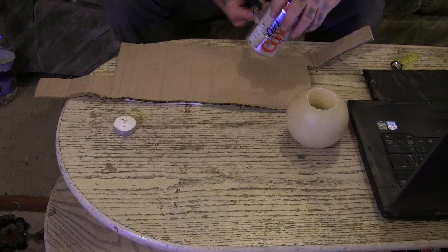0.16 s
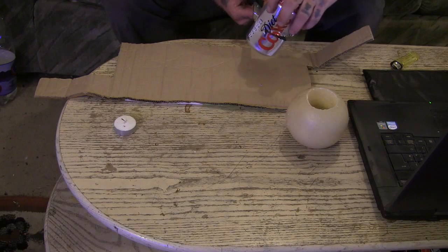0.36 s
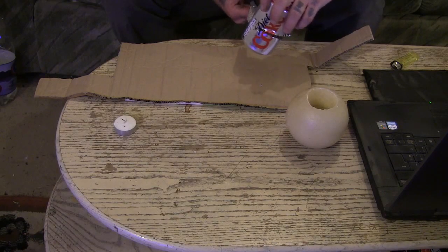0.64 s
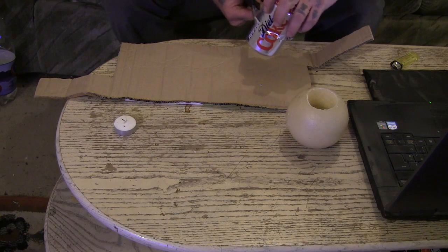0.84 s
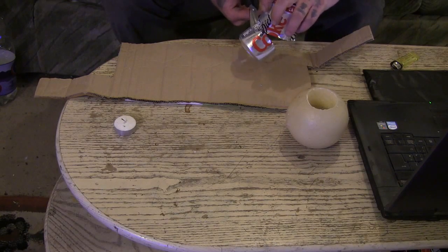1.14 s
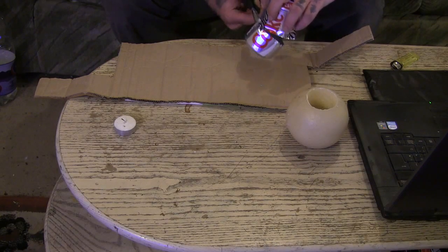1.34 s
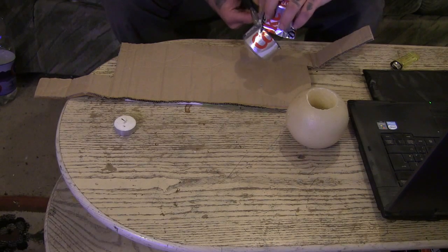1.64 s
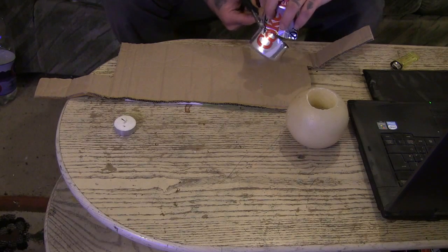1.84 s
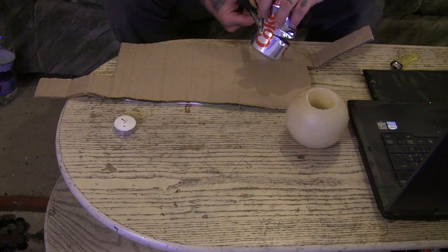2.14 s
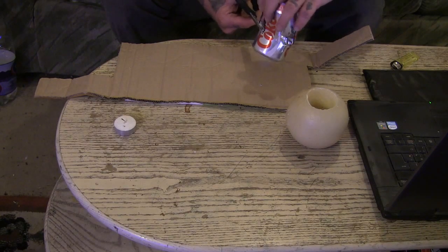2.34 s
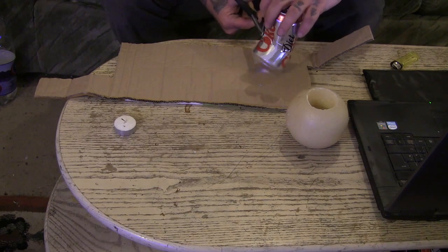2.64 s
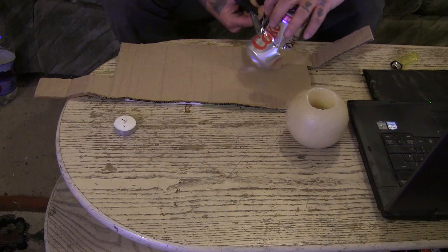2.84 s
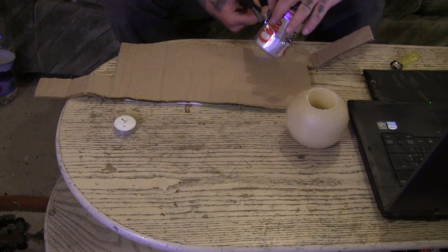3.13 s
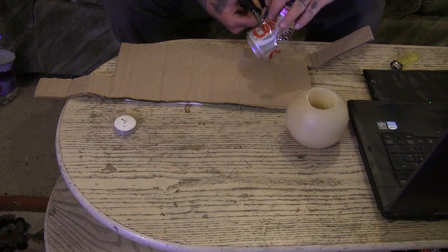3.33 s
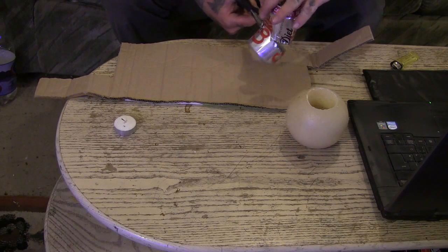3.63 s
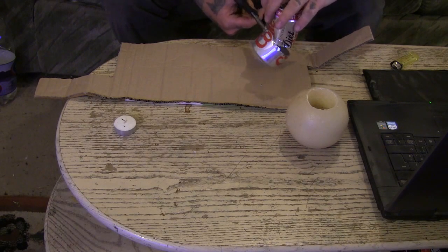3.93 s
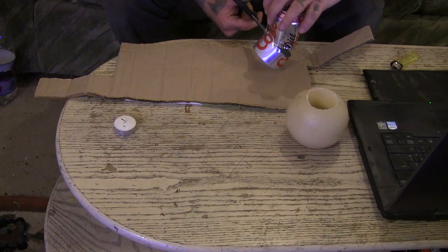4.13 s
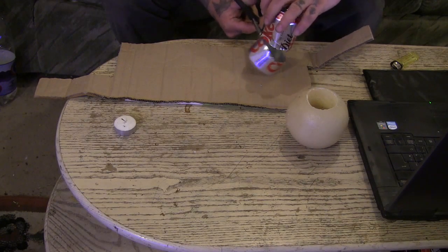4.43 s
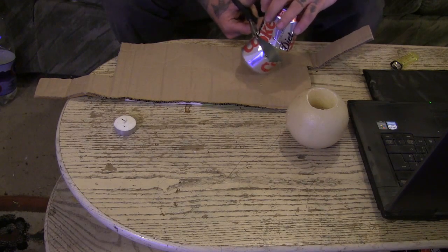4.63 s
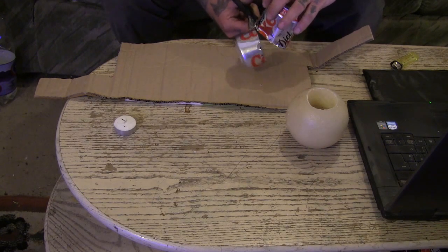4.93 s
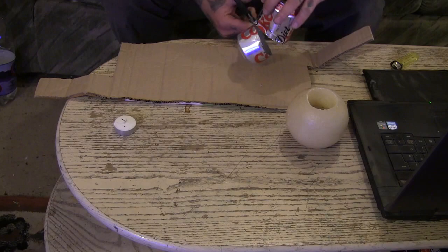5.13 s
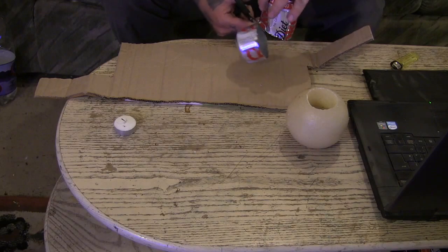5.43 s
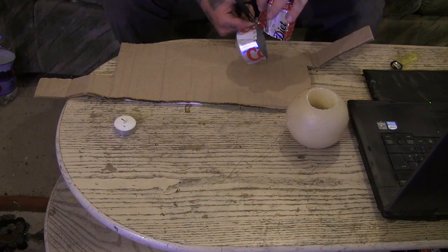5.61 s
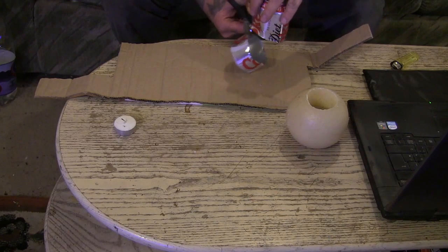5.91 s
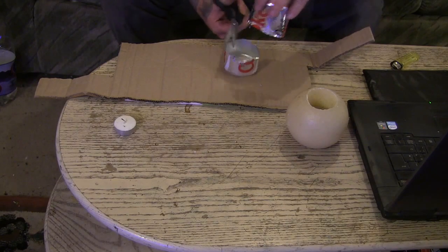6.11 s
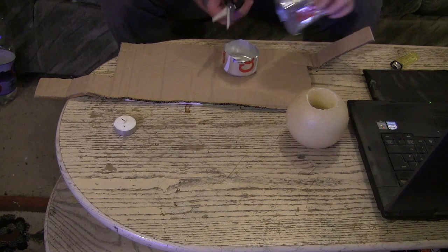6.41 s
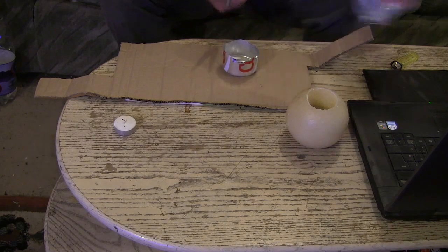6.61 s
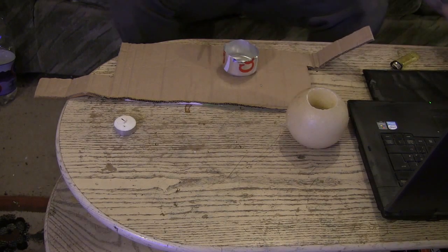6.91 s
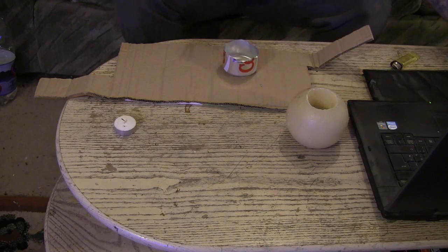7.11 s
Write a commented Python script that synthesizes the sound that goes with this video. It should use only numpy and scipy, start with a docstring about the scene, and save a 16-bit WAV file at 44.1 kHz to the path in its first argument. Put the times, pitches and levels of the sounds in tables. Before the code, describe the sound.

Thin can metal crunches, pops and crinkles under clicking scissor blades in a small room, ending with a hollow knock on cardboard.

```python
"""Crunching snips and sharp metallic snaps: scissors cut round a thin aluminium can in a small room.
Each stroke shears the metal in a burst of tiny slips; the wall buckles and rings briefly, at a pitch
that depends on how it is bent and held. Between cuts the can crinkles and the blades click.
Near the end the cut-off base drops on cardboard. Room noise and a faint whine lie underneath."""
import sys
import numpy as np
from scipy import signal
from scipy.fft import rfft, irfft, next_fast_len
from scipy.io import wavfile
from scipy.ndimage import uniform_filter1d, minimum_filter1d, map_coordinates

SR = 44100
rng = np.random.default_rng(int(sys.argv[2]) if len(sys.argv) > 2 else 0)


def generate_wav(sig):
    """Save sig (samples, or channels by samples) to the path in sys.argv[1] as 16-bit PCM at SR."""
    pcm = np.round(np.clip(np.atleast_2d(sig).T, -1, 1) * 32767).astype(np.int16)
    wavfile.write(sys.argv[1], SR, pcm)


N = 320144
CONTACT_S = np.arange(SR // 4) / SR  # time since one contact


def amp(db):
    return 10 ** (np.asarray(db) / 20)


def unit_rms(x):
    return x / np.sqrt(np.mean(x ** 2) + 1e-20)


def unit_energy(x):
    return x / np.sqrt(np.sum(x ** 2) + 1e-20)


def curve(points, hz):
    """Interpolate (Hz, value) points on a log frequency axis."""
    point_hz, values = np.transpose(points)
    return np.interp(np.log(hz + 1), np.log(point_hz + 1), values)


def filtered(x, gain):
    """Scale the spectrum of x by gain(hz)."""
    n = x.shape[-1]
    size = next_fast_len(n + SR // 8)
    return irfft(rfft(x, size) * gain(np.fft.rfftfreq(size, 1 / SR)), size)[..., :n]


def decay(t, t60_s):
    return np.exp(-np.log(1000) * t / np.maximum(t60_s, 1e-3))


def add(track, start_s, x):
    i = max(0, round(start_s * SR))
    track[..., i:i + x.shape[-1]] += x[..., :max(0, N - i)]


def dense_modes(spectrum_db, t60_s):
    """Countless overlapping modes: decaying noise through a minimum-phase filter."""
    n = len(CONTACT_S)
    cepstrum = irfft(np.log(amp(spectrum_db(np.fft.rfftfreq(2 * n, 1 / SR)))))
    cepstrum[1:n] *= 2
    cepstrum[n:] = 0
    noise = rng.standard_normal(n) * decay(CONTACT_S, t60_s)
    return unit_energy(irfft(rfft(noise, 2 * n) * np.exp(rfft(cepstrum)))[:n])


def ringing(modes, t60_s, scatter_db, detune, weight_db=np.zeros_like):
    """Distinct modes, each struck at a random strength and slightly detuned by bending."""
    hz, db = np.transpose(modes)
    strength, bend, polarity = rng.standard_normal((3, len(hz)))
    waves = np.cos(2 * np.pi * np.outer(hz * (1 + detune * bend), CONTACT_S)) * decay(CONTACT_S, t60_s)
    gains = np.sign(polarity) * amp(db + weight_db(hz) + scatter_db * strength)
    return unit_energy(gains @ waves)


def impulses(t, rate_per_s, spread_db):
    """Tiny jolts of uneven size at random moments."""
    occurs = rng.random(len(t)) < rate_per_s / SR
    size = amp(spread_db * np.clip(rng.standard_normal(len(t)), -2, 2))
    return occurs * rng.choice([-1, 1], len(t)) * size


# Room noise. Each row: frequency in Hz, relative density in dB.
AIR_SPECTRUM = [(15, -2.5), (35, -21.5), (70, -16.5), (120, -13.5), (150, -7), (200, -3.5), (340, -9),
                (700, -4.5), (1060, -4.5), (1400, -7.5), (3300, -15), (10800, -29.5), (16000, -37)]
# Its stereo width. Each row: frequency in Hz, left-right correlation.
AIR_CORRELATION = [(60, 0.31), (240, 0.43), (950, 0.92), (3770, 0.76), (15000, 0.55)]
# Electrical gear. Each row: frequency in Hz, relative level in dB.
WHINE_TONES = [(1044, -60.5), (1136, -65), (2266, -72.5), (3402, -70.5), (15622, -71.5)]
def background():
    """Steady room noise with a faint electrical whine."""
    def mid_side_gains(hz):
        angle = np.arccos(np.clip(curve(AIR_CORRELATION, hz), -1, 1)) / 2
        return amp(curve(AIR_SPECTRUM, hz)) * [np.cos(angle), np.sin(angle)]
    mid, side = filtered(rng.standard_normal((2, N)), mid_side_gains)
    t = np.arange(N) / SR
    whine = sum(amp(db) * np.sqrt(2) * np.sin(2 * np.pi * hz * t) for hz, db in WHINE_TONES)
    return amp(-52) * unit_rms(np.array([mid + side, mid - side])) + amp(-2) * whine


# Reverberation. Each row: frequency in Hz, T60 in seconds.
ROOM_T60 = [(200, 0.57), (530, 0.22), (1400, 0.26), (3700, 0.25), (12000, 0.16)]
# Width of the tail. Each row: frequency in Hz, side minus mid in dB.
ROOM_WIDTH = [(150, -19), (700, -10), (2000, -13.5), (4300, -8), (12000, -7.5)]
def in_room(x, wet_db, build_up_s=0.0011):
    """Direct sound plus the small room's tail, much alike left and right."""
    hz, t, spectra = signal.stft(rng.standard_normal((2, SR // 2)), SR, nperseg=256)
    spectra = spectra * decay(t, curve(ROOM_T60, hz)[:, None])
    spectra[1] *= amp(curve(ROOM_WIDTH, hz))[:, None]
    tails = signal.istft(spectra, SR, nperseg=256)[1]
    tails *= 1 - np.exp(-np.arange(tails.shape[1]) / SR / build_up_s)
    mid, side = amp(wet_db) * signal.fftconvolve(x[None], tails / np.linalg.norm(tails[0]), axes=1)
    mid[:len(x)] += x
    return np.array([mid + side, mid - side])


# Pitch of the bent wall. Each row: time in seconds, pitch in Hz.
WALL_PITCH = [(0.03, 804), (0.3, 915), (0.69, 930), (1.0, 775), (1.08, 990), (1.25, 1040), (1.55, 950),
              (1.84, 1090), (2.08, 980), (2.78, 1010), (2.9, 1595), (3.56, 1580), (3.62, 1300),
              (4.36, 1240), (4.55, 1190), (4.85, 1400), (5.68, 1490), (6.2, 1400)]
def wall_hz(time_s):
    """The pitch drifts as the cut opens and the grip changes."""
    return np.interp(time_s, *np.transpose(WALL_PITCH))


# The wall's dense modes. Each row: frequency in Hz, relative density in dB.
WALL_SPECTRUM = [(200, -61.5), (500, -6.5), (700, 9.5), (1000, -0.5), (1700, 7.5), (2300, -1),
                 (3200, -11.5), (6000, -42)]
# Its distinct bending modes. Each row: frequency in Hz, relative level in dB.
WALL_MODES = [(708, 4), (760, -2.5), (825, -5), (921, 5), (975, 2.5), (1060, -3), (1127, 3.5), (1235, 1),
              (1310, 1), (1418, -0.5), (1602, -1), (1671, -1.5), (1747, 0), (1996, 1.5), (2100, -4),
              (2316, -1.5)]
def wall(pitch_hz, width_octaves=0.12, focus_db=11, low_cut_db=11):
    """The pushed wall rings most near the bent panel's pitch, and little far below it."""
    def emphasis_db(hz):
        octaves = np.log2((hz + 1) / pitch_hz)
        peak_db = focus_db / (1 + (octaves / width_octaves) ** 2)
        return peak_db + low_cut_db * np.clip(octaves + 0.5, -1, 0)
    dense = dense_modes(lambda hz: curve(WALL_SPECTRUM, hz) + emphasis_db(hz), t60_s=0.045)
    ring = ringing(WALL_MODES, t60_s=0.098, scatter_db=1.5, detune=0.0061, weight_db=emphasis_db)
    return unit_energy(dense + amp(2) * ring)


# Breaking metal. Each row: frequency in Hz, relative density in dB.
CRACK_SPECTRUM = [(350, -30), (800, -22), (1900, -1.5), (2600, -5.5), (3500, 0.5), (4600, -5.5),
                  (6000, -7.5), (9000, -8), (12000, -12), (14000, -18.5), (16000, -45.5)]
# High modes of the cut rim and blades. Each row: frequency in Hz, relative level in dB.
RIM_MODES = [(2455, -6), (2607, -3), (3213, -3), (3435, 4), (3530, -1), (3760, -3), (4250, -5), (5410, -4),
             (6950, -9)]
def crack(brightness, t60_s, rim_db):
    """A sharp break in the metal sets the rim ringing; brightness tilts the treble."""
    def tilt_db(hz):
        return brightness * curve([(3500, 0.044), (9500, 0.88)], hz)
    dense = dense_modes(lambda hz: curve(CRACK_SPECTRUM, hz) + tilt_db(hz), t60_s)
    rim = ringing(RIM_MODES, t60_s=0.056, scatter_db=-1.5, detune=0.004, weight_db=tilt_db)
    return unit_energy(dense + amp(rim_db) * rim)


# Low knock. Each row: frequency in Hz, relative density in dB.
THUD_SPECTRUM = [(120, -33.5), (160, -10), (260, -16), (410, 3.5), (560, 1), (800, -6), (1600, -35.5)]
# Low modes of can and table. Each row: frequency in Hz, relative level in dB.
HOLLOW_MODES = [(265, -6.5), (407, 2), (560, -2)]
def thud(t60_s):
    """The low knock of the whole can and what it touches."""
    dense = dense_modes(lambda hz: curve(THUD_SPECTRUM, hz), t60_s)
    hollow = ringing(HOLLOW_MODES, t60_s=0.086, scatter_db=2, detune=0.0039)
    return unit_energy(dense + amp(-5) * hollow)


# Bumps; the base lands at 6.2 s. Each row: start in seconds, relative level in dB, hollow pitch in Hz.
CARDBOARD_KNOCKS = [(2.649, -36, 267), (4.313, -44, 425), (6.2062, -28.5, 559), (6.222, -32.5, 385),
                    (6.9057, -49, 564)]
def knocks(rise_s=0.002):
    """The can meets the cardboard: a thud, a hollow note, a ring and a dull crack."""
    out = np.zeros((2, N))
    envelope = decay(CONTACT_S, t60_s=0.11) * (1 - np.exp(-CONTACT_S / rise_s))
    for start_s, db, hollow_hz in CARDBOARD_KNOCKS:
        note = unit_energy(np.sin(2 * np.pi * hollow_hz * CONTACT_S) * envelope)
        ring = amp(5) * wall(wall_hz(start_s))
        tick = amp(-5.5) * crack(brightness=-7.5, t60_s=0.037, rim_db=-20)
        blow = amp(-2.5) * thud(t60_s=0.046) + amp(-2) * note + ring + tick
        add(out, start_s, in_room(amp(db + 26.5) * blow, wet_db=-5.5))
    return out


def rasp(force, pitch_hz, ring_db, crackle_db, brightness, slips_per_s):
    """While the force lasts, every stick-slip jolt crackles and shakes the wall."""
    t, length_s = np.arange(len(force)) / SR, len(force) / SR
    slips = force * impulses(t, slips_per_s, spread_db=4.5)
    # Early, middle and late slips each meet a differently bent sheet.
    stages = [slips * np.clip(1 - abs(2 * t / length_s - k), 0, 1) for k in range(3)]
    def driven(response):
        return unit_energy(sum(signal.fftconvolve(stage, response()) for stage in stages))
    ring = amp(ring_db - 3) * driven(lambda: wall(pitch_hz))
    crackle = amp(crackle_db - 2.33) * driven(lambda: crack(brightness, t60_s=0.012, rim_db=-6.5))
    rumble = amp(ring_db - 20) * driven(lambda: thud(t60_s=0.11))
    return in_room(np.sqrt(len(force)) * (ring + crackle + rumble), wet_db=-6.5)


# Turning the can. Each row: start in seconds, length in seconds, relative ring level in dB.
WALL_FLEXES = [(0.249, 0.1, -37.5), (0.377, 0.049, -30.5), (0.593, 0.068, -33), (1.25, 0.14, -32),
               (1.461, 0.097, -34), (1.662, 0.13, -38.5), (2.463, 0.028, -41), (2.794, 0.11, -44.5),
               (2.967, 0.064, -34.5), (3.132, 0.079, -37.5), (3.307, 0.074, -34), (3.615, 0.16, -38.5),
               (4.108, 0.044, -47.5), (4.63, 0.25, -42), (4.839, 0.091, -32), (5.1, 0.14, -34),
               (5.276, 0.13, -34.5), (5.421, 0.21, -39), (5.692, 0.13, -35.5), (6.102, 0.057, -42),
               (7.226, 0.05, -38)]
def flexes(clump_db=2, clump_s=0.01414):
    """Light, uneven handling crinkles the wall in clumps, with more ring than crackle."""
    out = np.zeros((2, N))
    for start_s, length_s, ring_db in WALL_FLEXES:
        t = np.arange(0, length_s, 1 / SR)
        clumps = map_coordinates(rng.standard_normal(100), [t / clump_s], mode="mirror")
        force = amp(clump_db * clumps)
        pitch_hz = wall_hz(start_s + length_s / 2)
        crackle_db = ring_db - 8
        add(out, start_s, rasp(force, pitch_hz, ring_db, crackle_db, brightness=-5, slips_per_s=900))
    return out


# Brief notes. Each row: start in seconds, length in seconds, pitch in Hz, level in dB.
PANEL_SQUEALS = [(0.026, 0.03, 1750, -21.5), (0.391, 0.03, 897, -37), (1.244, 0.024, 1080, -18.5),
                 (1.393, 0.026, 940, -31), (1.836, 0.039, 1190, -35.5), (2.589, 0.031, 955, -21.5),
                 (2.785, 0.043, 1120, -43.5), (3.423, 0.04, 1606, -24), (4.508, 0.04, 1774, -29),
                 (5.033, 0.035, 1446, -23), (5.945, 0.037, 1422, -33.5)]
def squeals(waver=0.0082):
    """Slips lock on to the bent panel's mode, which swells and fades with the blade's pressure."""
    out = np.zeros((2, N))
    for start_s, length_s, pitch_hz, db in PANEL_SQUEALS:
        n = round(length_s * SR)
        force = uniform_filter1d(np.hanning(n), size=200, mode="constant")
        drift = unit_rms(uniform_filter1d(rng.standard_normal(n), size=500))
        phase = 2 * np.pi * np.cumsum(pitch_hz * (1 + waver * drift)) / SR
        add(out, start_s, in_room(amp(db) * unit_rms(force * np.sin(phase)), wet_db=-8.5))
    return out


# Scissor steel. Each row: frequency in Hz, relative level in dB.
BLADE_MODES = [(1000, -4), (2004, -4), (2230, -4), (3450, -12.5), (5450, -7.5), (7200, -2)]
# The blades shut or catch on the rim. Each row: time in seconds, relative level in dB.
BLADE_CLICKS = [(0.13, -32), (0.226, -36.5), (0.3392, -30.5), (1.028, -22.5), (2.2993, -23.5),
                (2.477, -48.5), (2.782, -39.5), (2.83, -42), (3.242, -29.5), (3.5432, -30.5), (3.78, -41),
                (3.863, -31), (3.9089, -30), (4.483, -39), (4.5, -31), (4.583, -25.5), (4.62, -24),
                (5.284, -60), (5.305, -38.5), (5.5128, -38.5), (5.842, -26.5), (7.233, -39.5)]
def clicks(lead_in_s=0.008, can_hz=1935):
    """A faint, short lead-in, then the blades' bright click with a thin, high ring."""
    out, t = np.zeros((2, N)), np.arange(0, lead_in_s, 1 / SR)
    for time_s, db in BLADE_CLICKS:
        steel = amp(-6) * ringing(BLADE_MODES, t60_s=0.12, scatter_db=4, detune=0.002)
        can = amp(-7) * wall(can_hz) + amp(-21) * thud(t60_s=0.073)
        click = amp(db + 25) * (crack(brightness=9, t60_s=0.019, rim_db=-5.5) + steel + can)
        lead_in = unit_energy(impulses(t, rate_per_s=3500, spread_db=8.5) * t)
        add(out, time_s - lead_in_s, amp(-23) * signal.fftconvolve(lead_in, click))
        add(out, time_s, in_room(click, wet_db=-3.5))
    return out


# Buckling. Each row: time in seconds, then relative levels in dB of ring, crack and thud.
WALL_SNAPS = [(0.0266, -15.5, -14.5, -57), (0.24, -32.5, -31, -43), (0.2919, -22, -18.5, -44),
              (0.622, -25, -32, -39), (0.698, -19.5, -28, -32), (0.828, -13.5, -11.5, -65),
              (0.9859, -30, -21, -34), (1.062, -22, -11, -42), (1.229, -14, -17.5, -24),
              (1.254, -19, -35, -41.5), (1.434, -30, -20, -28), (1.44, -18, -17, -33.5),
              (1.658, -32.5, -36, -43), (1.695, -31, -38, -58.5), (1.784, -25.5, -26.5, -37.5),
              (1.822, -25, -25, -41), (2.05, -23.5, -13, -36), (2.582, -27.5, -18.5, -29),
              (2.613, -26.5, -17.5, -35), (2.916, -13.5, -21, -52), (3.048, -31, -35, -66),
              (3.338, -24.5, -32, -56), (3.4213, -23.5, -28.5, -58), (3.5999, -22.5, -21, -38.5),
              (4.357, -36.5, -44.5, -55), (4.508, -25, -20, -64), (4.5464, -22.5, -21, -46.5),
              (4.845, -22.5, -31, -65), (4.896, -27, -35, -40), (5.037, -23.5, -24, -53),
              (5.135, -32, -35.5, -61), (5.6812, -22.5, -29, -42), (5.939, -34, -26, -49)]
def snaps(lead_in_s=0.014):
    """The wall pops through with a crack, a ring and a thud; a faint lead-in swells into each snap."""
    out, t = np.zeros((2, N)), np.arange(0, lead_in_s, 1 / SR)
    for time_s, ring_db, crack_db, thud_db in WALL_SNAPS:
        ring = amp(ring_db + 26.5) * wall(wall_hz(time_s))
        brightness = -3 + 0.77 * (crack_db - ring_db)
        tick = amp(crack_db + 26) * crack(brightness, t60_s=0.052, rim_db=-12)
        knock = amp(thud_db + 25) * thud(t60_s=0.048)
        lead_in = unit_energy(impulses(t, rate_per_s=14000, spread_db=-6.5) * t)
        add(out, time_s - lead_in_s, amp(-20.5) * signal.fftconvolve(lead_in, ring + tick))
        add(out, time_s, in_room(ring + knock, wet_db=-4.5))
        add(out, time_s, in_room(tick, wet_db=-5))
    return out


# Strokes. Each row: start and length in seconds, relative crackle and ring levels in dB, brightness.
SCISSOR_CUTS = [(0, 0.026, -22, -21, -5), (0.64, 0.081, -27.5, -21.5, -14), (0.812, 0.13, -27, -27.5, -5),
                (0.986, 0.089, -31.5, -28.5, -7), (1.066, 0.12, -28, -22.5, -5.5),
                (1.823, 0.044, -19.5, -18.5, -8.5), (2.063, 0.061, -31.5, -28, 1.5),
                (2.58, 0.039, -28.5, -17, -11), (2.893, 0.084, -18.5, -20.5, -7),
                (3.193, 0.077, -33, -31.5, -2), (3.235, 0.06, -22, -24.5, 0.5),
                (3.421, 0.05, -32, -29.5, -6), (3.546, 0.047, -26.5, -26.5, -9),
                (3.898, 0.076, -39.5, -36.5, -2), (4.496, 0.11, -29.5, -29.5, -24),
                (5.015, 0.087, -29.5, -23.5, -3), (5.556, 0.083, -33.5, -33, 4),
                (5.821, 0.099, -39.5, -33.5, -3.5), (5.936, 0.041, -40, -31, -18)]
def cuts(attack_s=0.0083, grip_db=-14, sag_db=-6.5):
    """The blades bite quickly, then shear on with easing force in a dense rasp."""
    out = np.zeros((2, N))
    for start_s, length_s, crackle_db, ring_db, brightness in SCISSOR_CUTS:
        t = np.arange(0, length_s, 1 / SR)
        force = amp(np.interp(t, [0, attack_s, length_s], [grip_db, 0, sag_db]))
        pitch_hz = wall_hz(start_s + length_s / 2)
        add(out, start_s, rasp(force, pitch_hz, ring_db, crackle_db, brightness, slips_per_s=4500))
    return out


def scene():
    """The can sits a little left of centre; only its sharp blows carry deep bass."""
    low_cut = signal.butter(2, 130, "highpass", fs=SR, output="sos")
    rasps = signal.sosfilt(low_cut, cuts() + flexes())
    can = snaps() + clicks() + knocks() + squeals() + rasps
    return can * amp([[0.25], [-0.25]]) + background()


def record(dry, top_hz=15800):
    """A limiter holds the sharpest snaps at full scale, then the top treble is cut."""
    needed_gain = 1 / np.maximum(1, np.abs(dry).max(axis=0))
    gain = uniform_filter1d(minimum_filter1d(needed_gain, size=65), size=65)
    return filtered(dry * gain, lambda hz: hz < top_hz)


dry = scene()
out = record(dry)
generate_wav(out)
```